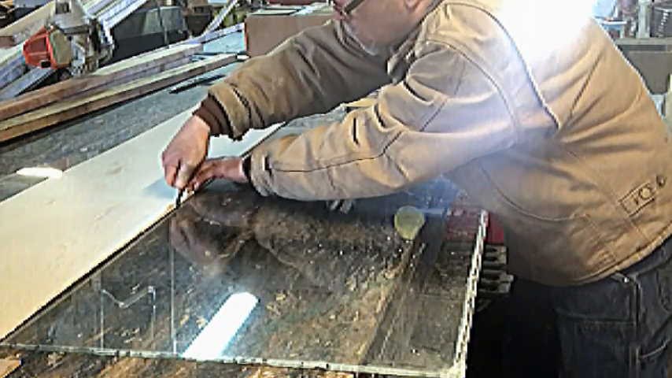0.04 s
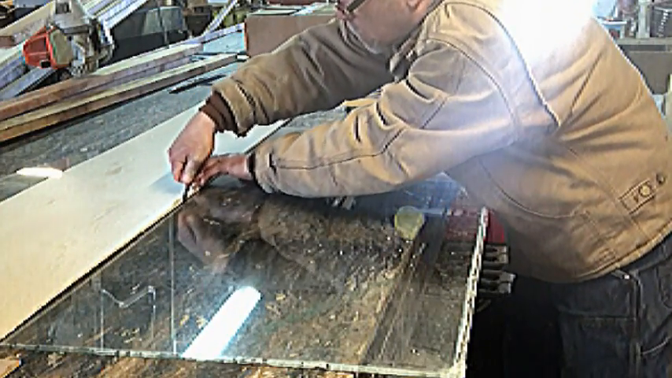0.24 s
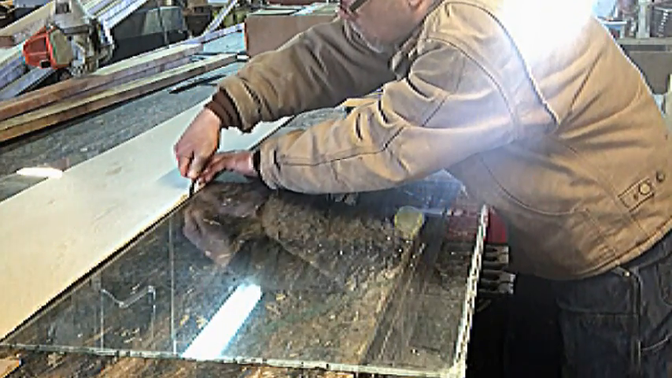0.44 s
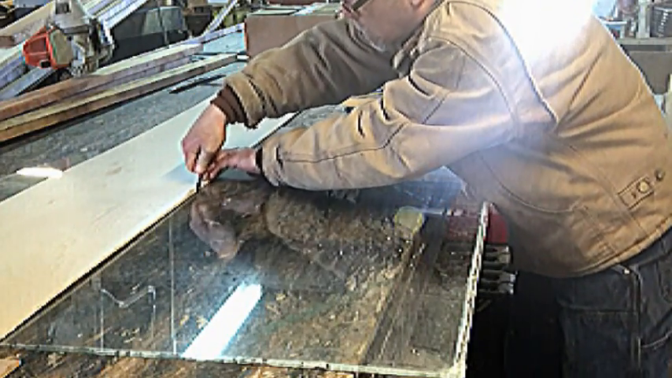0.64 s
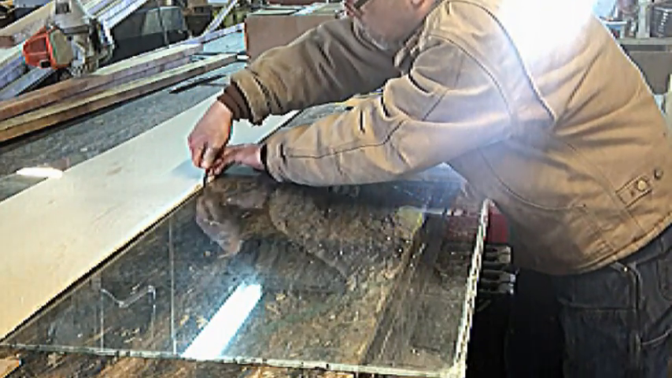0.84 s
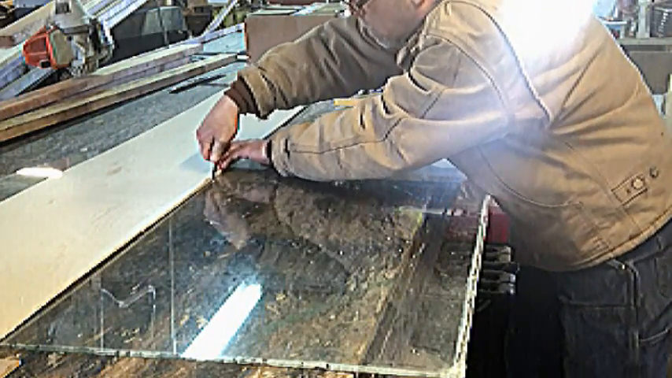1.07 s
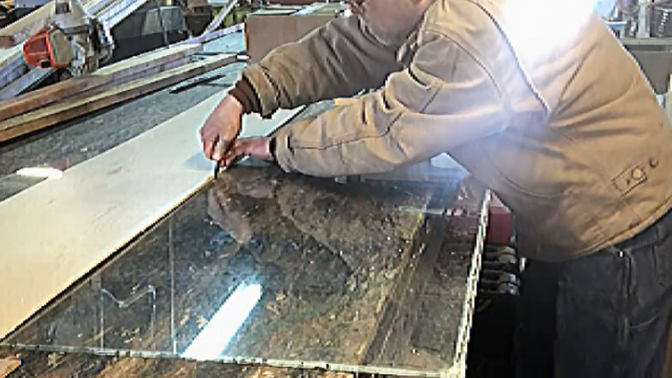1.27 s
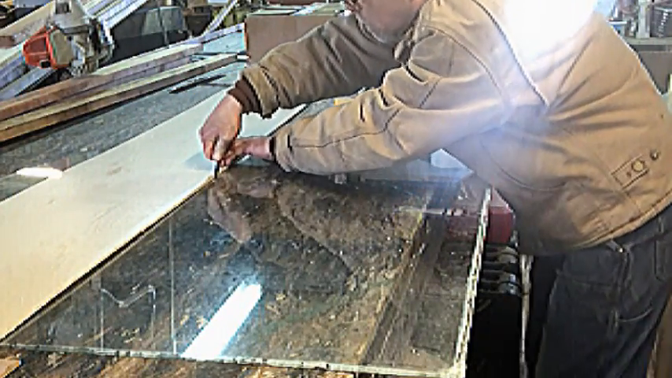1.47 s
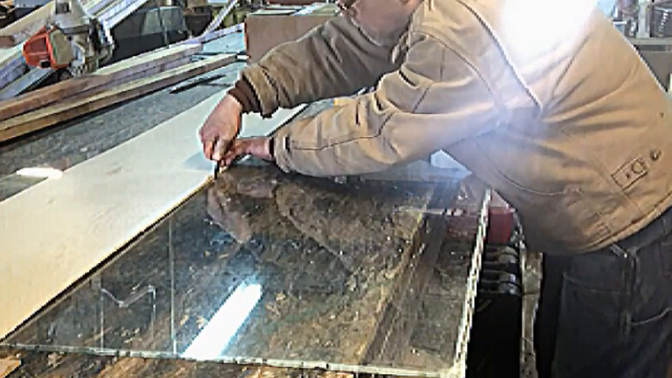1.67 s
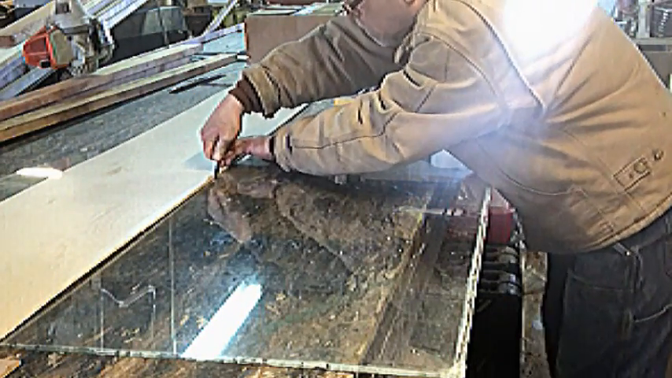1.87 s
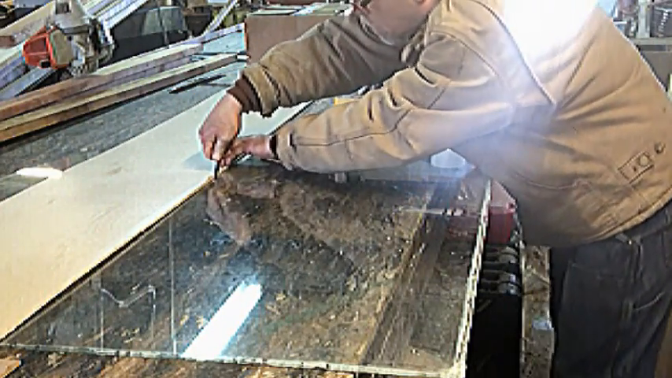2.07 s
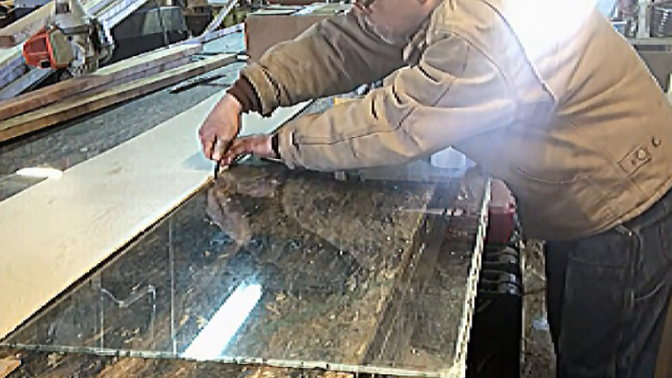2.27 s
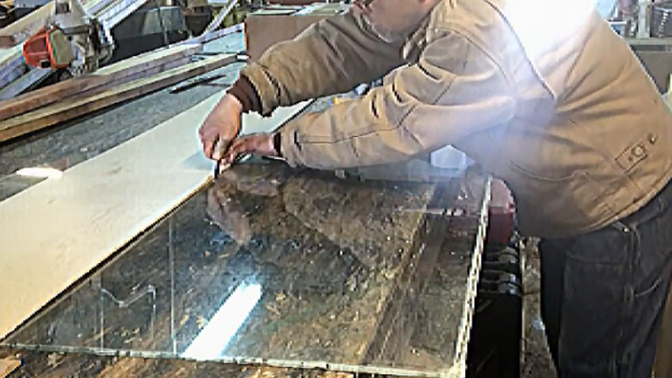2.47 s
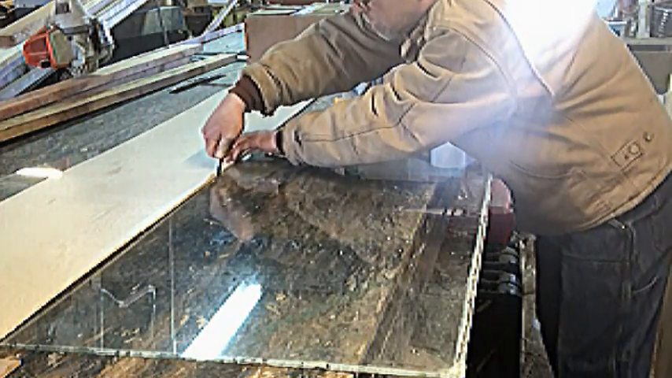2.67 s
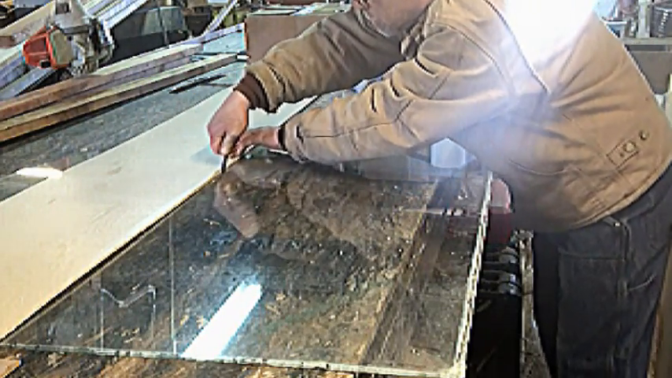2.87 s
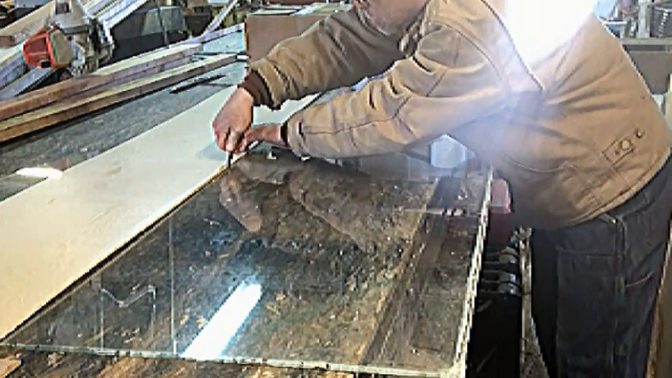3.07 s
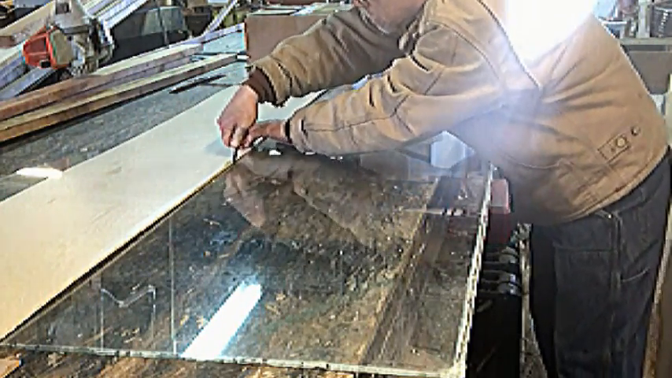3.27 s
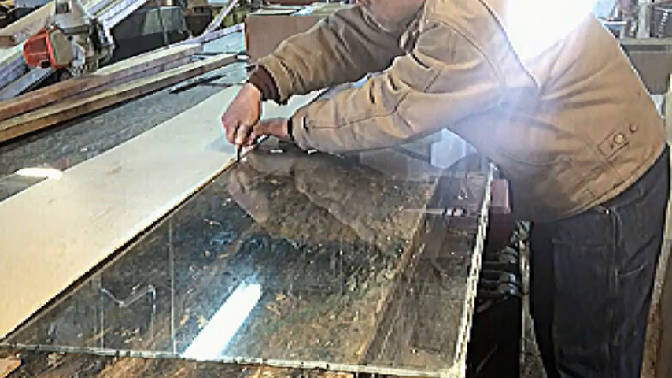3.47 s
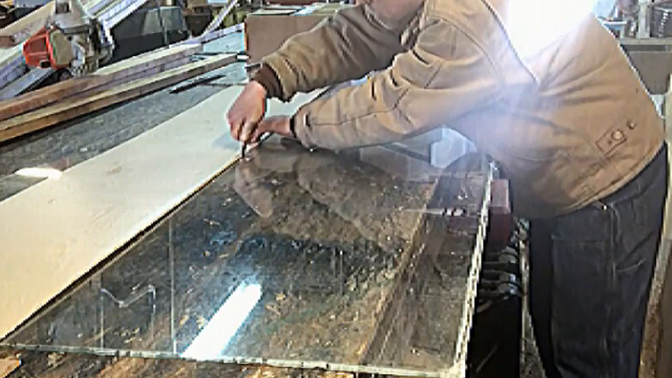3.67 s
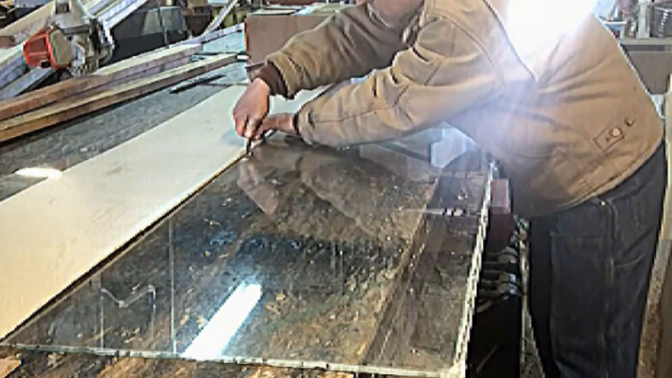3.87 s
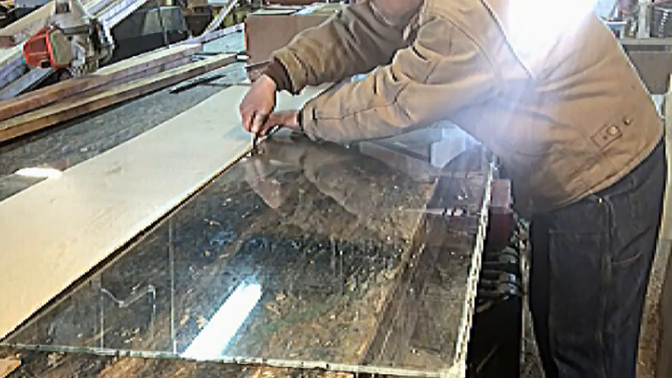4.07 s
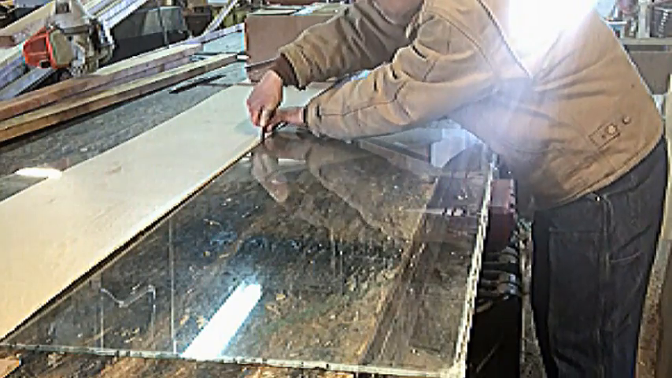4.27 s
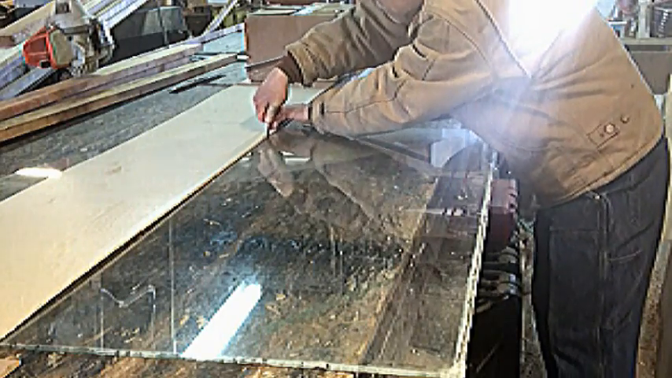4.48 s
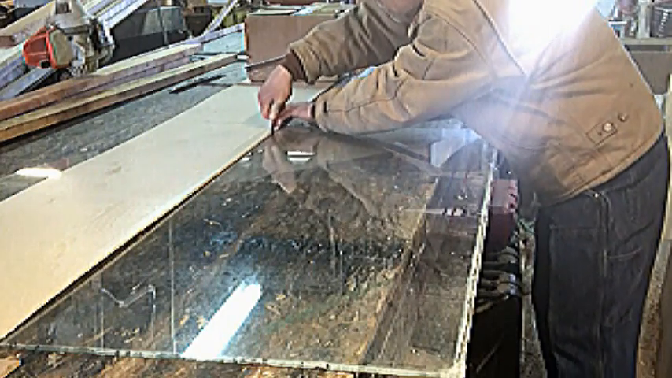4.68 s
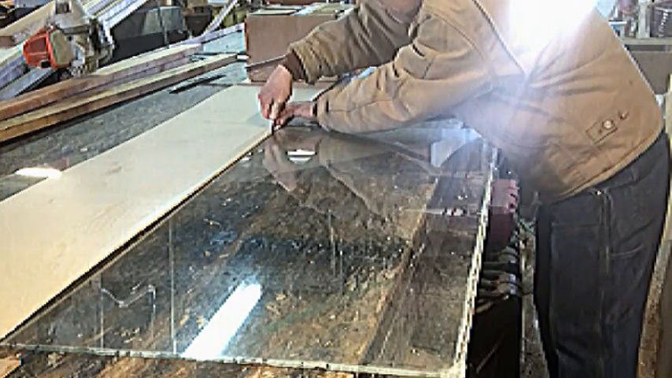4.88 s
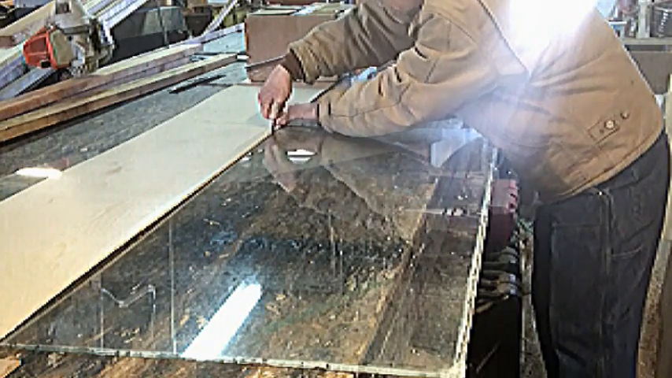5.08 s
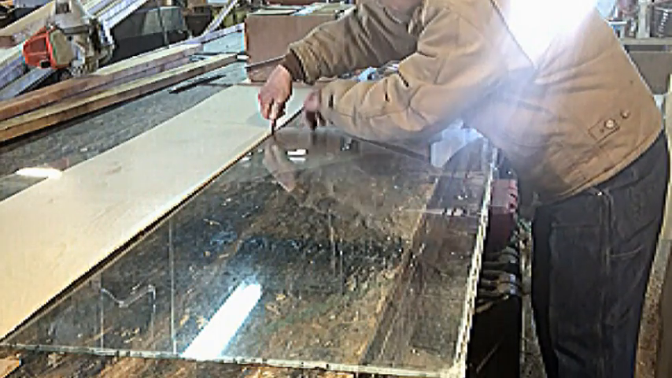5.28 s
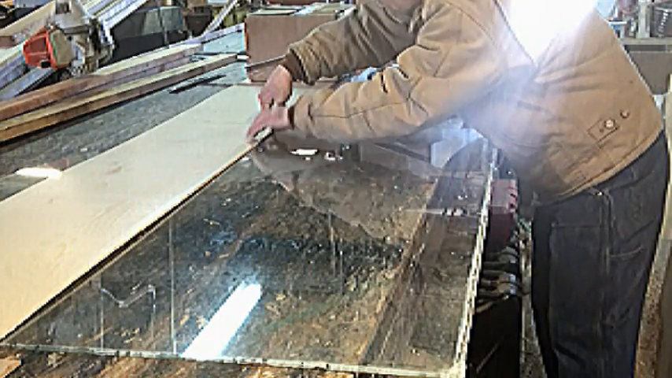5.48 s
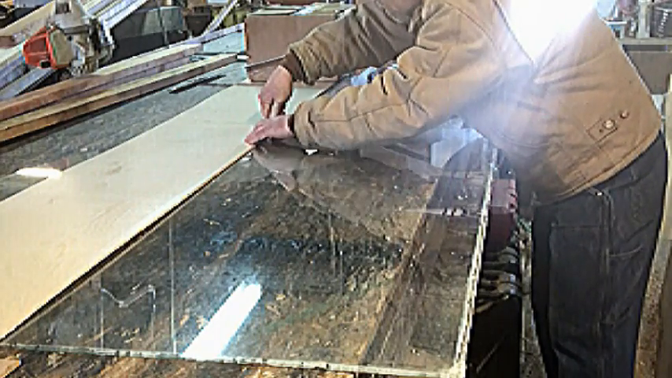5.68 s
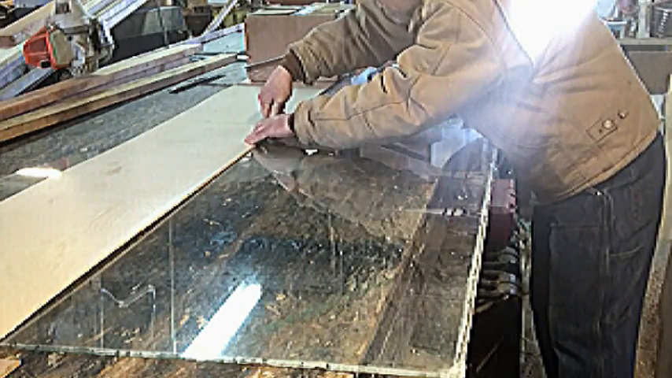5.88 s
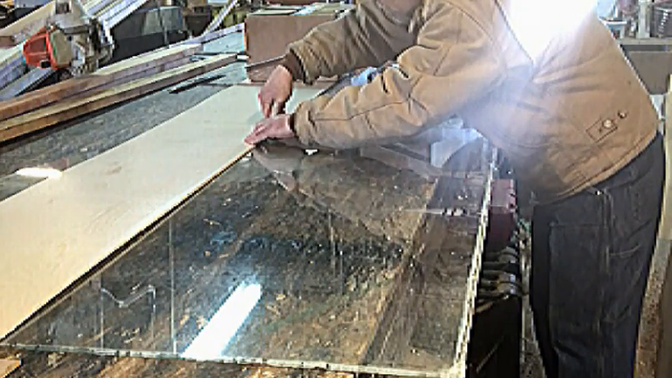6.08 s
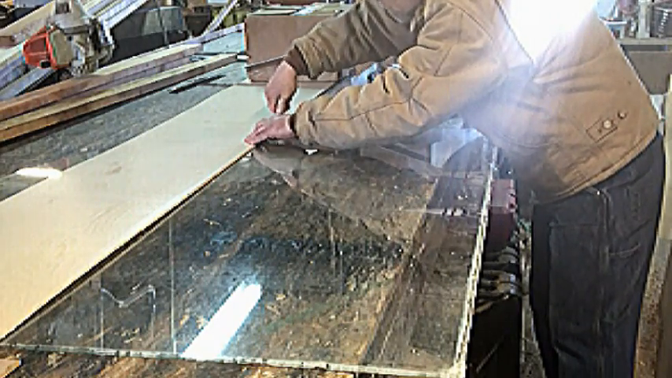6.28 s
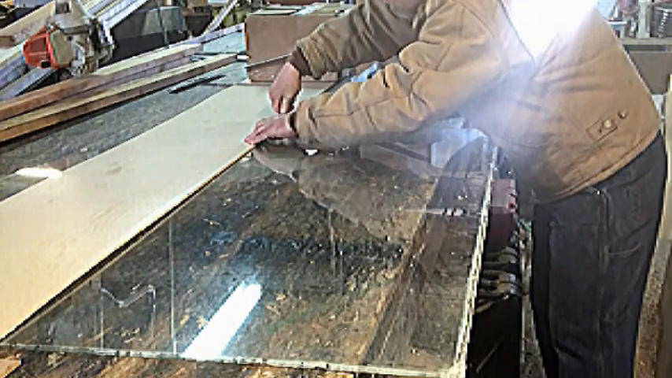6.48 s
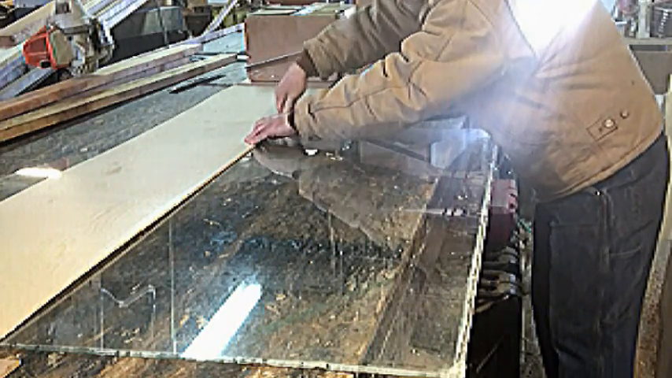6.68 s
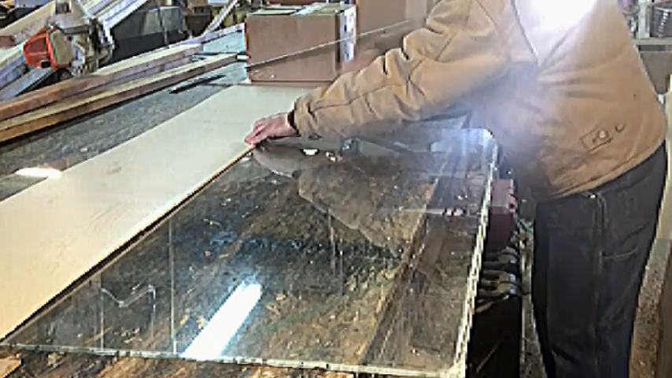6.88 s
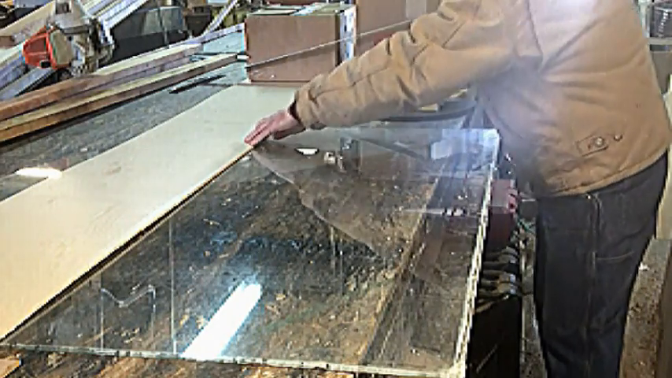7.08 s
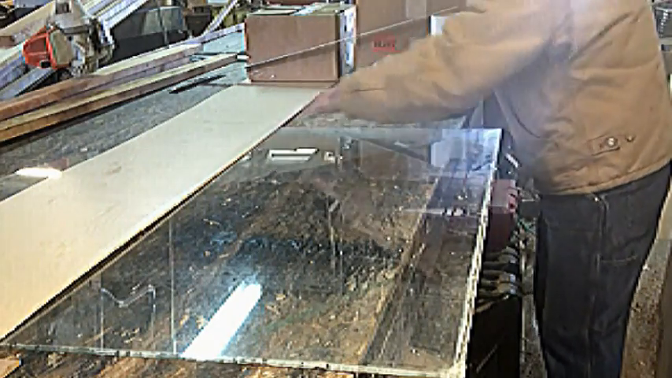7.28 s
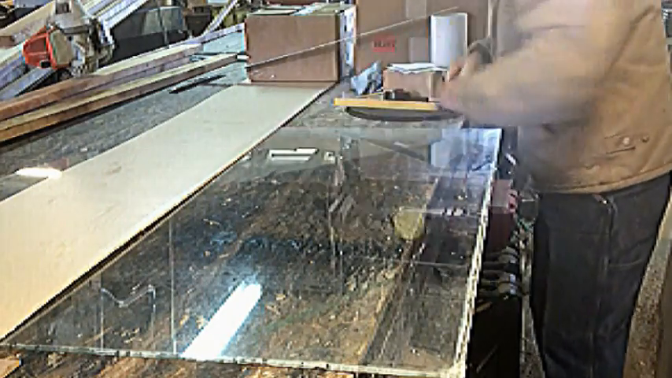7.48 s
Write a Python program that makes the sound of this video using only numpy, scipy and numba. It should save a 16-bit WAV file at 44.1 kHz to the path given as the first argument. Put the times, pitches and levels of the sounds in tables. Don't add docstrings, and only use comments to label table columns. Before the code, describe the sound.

A small wheel cutter rolls over window glass in a workshop, giving a gritty, bright hiss full of tiny cracks and a glassy singing tone. It stops, there are soft knocks and sleeve rubs, then a longer stroke swells and breaks off. After a quiet gap a short, louder scratch ends with a snap and a woody knock. Faint rustling and a tap follow, heard close on a plain mono camera microphone.

```python
import sys
import numpy as np
from scipy import signal
from scipy.fft import rfft, irfft
from scipy.io import wavfile
from scipy.ndimage import uniform_filter1d, map_coordinates
from numba import njit

SR = 44100
rng = np.random.default_rng(int(sys.argv[2]) if len(sys.argv) > 2 else 0)


def amp(db):
    return 10 ** (np.asarray(db, float) / 20)


def write(x):
    x = np.atleast_2d(x).T
    wavfile.write(sys.argv[1], SR, np.round(np.clip(x, -1, 1) * 32767).astype(np.int16))


N = 332514
TIME = np.arange(N) / SR

# [t/s, hiss level/dB]
STROKES = [
    [(0, -24.5), (.33, -26.5), (.42, -25), (.62, -24), (.95, -25), (1.238, -27.5), (1.252, -47)],
    [(2.64, -27.5), (2.67, -24.5), (2.79, -25), (3.06, -23.5), (3.42, -26), (3.88, -22), (4.3, -20.5),
     (4.5, -20), (4.73, -26)],
    [(6.11, -24), (6.156, -21), (6.248, -16.5), (6.26, -16), (6.31, -18.5)],
]
# [start t/s, treble share level/dB, fringe climb/(share per s)]
PACE = [
    (0, -12, 0.13),
    (2.3, -12, 0.21),
    (5.9, -8, 0.63),
]
# [t/s, peak level/dB, tearing duration/ms]
BITES = [(2.4229, -17.5, .02), (2.4309, -18, .02), (2.4441, -16.5, 0.032), (2.4615, -19, 0.035),
         (2.5666, -21.5, 0.046), (2.58, -19.5, 0.03), (2.5866, -22, .02), (2.607, -16.5, 1.3),
         (2.6269, -16, 1.3), (5.985, -19.5, 5.4), (6.029, -15, 6.5), (6.062, -15.5, 4.4), (6.102, -20, 4)]
# [t/s, peak level/dB]
SNAPS = [(0.1121, -20), (0.4414, -21), (0.6574, -11), (0.8375, -11), (0.8904, -13), (0.9572, -8),
         (2.6668, -16), (3.1487, -13), (3.4739, -11), (3.4969, -13), (3.6181, -9.5), (3.7014, -27),
         (3.775, -9), (3.8645, -2.5), (4.2292, -10), (4.2482, -9), (4.6657, -12.5), (6.1657, -15),
         (6.2131, -7.5), (6.2406, -9), (6.3054, 0)]
# [t/s, level/dB, duration/ms]
HALTS = [(0.067, -11, 15), (0.167, -16, 18), (0.182, -3, 6.3), (0.357, -27, 10.5), (0.385, -23, 17),
         (0.493, -7, 11), (0.575, -5, 24), (0.751, -12, 31), (0.822, -14, 26), (0.869, -15, 28),
         (1.023, -8, 11), (1.035, -1, 9), (1.055, -15, 4.7), (1.168, -12.5, 23), (2.72, -27, 10),
         (2.751, -8, 20), (2.849, -4, 9), (3.244, 7, 6), (3.362, 0, 5), (3.468, -19, 23), (3.61, -13, 20),
         (3.672, -18, 9.4), (3.689, -12, 25), (3.72, -12, 20), (3.802, -5, 45), (4.089, -6, 13.4),
         (4.491, -6.5, 25), (4.651, -8, 13), (.346, -14, 12),
         (0.045, -20, 7), (0.097, -13, 14), (0.144, -10.0, 5), (0.257, -14, 6.3), (0.278, -4, 16),
         (0.436, -14, 5.5), (0.474, -4, 5.6), (0.591, -3, 7.0), (0.632, -30, 4), (0.678, 2, 20),
         (0.77, 1, 8.0), (0.793, -29, 4.8), (0.952, -2, 13), (1.114, 1, 6.4), (2.82, -3, 7.7),
         (2.947, -8, 8.9), (2.963, -10, 5.9), (2.999, -8.0, 8.0), (3.063, -6.0, 11), (3.115, -3.5, 15),
         (3.2, -11, 6.9), (3.581, -8, 4.4), (3.783, -7.0, 9.9), (3.861, -10.5, 5.4), (3.92, -8.5, 6.4),
         (4.029, -6, 7.0), (4.136, -11, 6.7), (4.194, 0, 17), (4.376, -7.0, 13), (4.392, -6, 7.8),
         (4.453, -10, 19), (4.475, -4, 7.0), (4.518, -9, 11), (4.546, 0, 8.9), (6.224, -6, 6.1)]
# [t/s, level/dB, duration/ms]
SURGES = [(0.023, 4.2, 11.0), (0.084, 2.7, 17.0), (0.116, 5.6, 32), (0.189, 1.9, 7.3), (0.249, 7, 12),
          (0.313, 6, 12), (0.33, 9.2, 14), (0.368, 3.6, 17.0), (0.422, 3.2, 13), (0.446, 6.0, 16),
          (0.529, 4.8, 27), (0.624, 3.1, 14.0), (0.639, 7.4, 15), (0.661, 5.0, 7), (0.728, 6.0, 22),
          (0.786, 2.6, 24), (0.807, 4.8, 13), (0.838, 11.4, 21), (0.894, 3.4, 18), (0.936, 5, 29),
          (0.977, 4.4, 18), (1.007, 5.1, 21), (1.082, 5, 26), (1.132, 1.7, 8.1), (1.195, 2.9, 7.6),
          (1.21, 2.3, 3.7), (2.67, 7.5, 21), (2.702, 6.0, 11.0), (2.731, 3.6, 22), (2.769, 3.6, 28),
          (2.911, 3.5, 14), (2.93, 2.5, 14), (2.954, 2.7, 11.0), (3.03, 1.5, 15), (3.151, 6.2, 28),
          (3.188, 9, 21), (3.29, 6.7, 15), (3.342, 6, 31), (3.44, 3.6, 18.0), (3.455, 4.0, 9.0),
          (3.5, 2.7, 12), (3.548, 4.0, 10), (3.563, 1.9, 11), (3.645, 10.4, 13), (3.712, 3.7, 22.0),
          (3.732, 3.1, 9.2), (3.775, 2.4, 7.1), (3.868, 4.6, 8.1), (3.894, 2.3, 5.1), (4.022, 3.0, 11),
          (4.124, 4.9, 37), (4.178, 3.4, 39), (4.233, 3, 13.0), (4.25, 3.6, 8.2), (4.34, 5, 14.0),
          (4.426, 2.5, 14), (4.537, 2.8, 21.0), (4.604, 3.4, 56), (4.669, 6.1, 23.0), (4.71, 7, 8.8)]
# [f/Hz, width/Hz, gain/1]
CHIP = [(2750, 700., -.8), (3490, 250., 1.45), (4200., 310, 0.55)]
# [f/Hz, level/dB per Hz]
PANE = [(1060, -28.5), (1800, -18), (2120, -19.5), (2630, -15), (3810, 4), (4820, -12), (5320, -10),
        (5990, -8.5), (7850, -20), (8830, -15), (10600, -21.5), (11600, -18), (12600, -17.5), (14800, -19),
        (15600, -25)]
# [delay/ms, level/dB, shortening/(1 per s of rolling)]
EDGES = [(1.5, -18, 0.201), (2.5, -10.5, .3), (3.6, -9, 0.124), (4.7, -12.5, .25), (6.3, -14, 0.1037)]
# [start t/s, duration/s, start f/Hz, level/dB]
FRINGES = [(-.1, 0.98, 3452, 0.5), (.4, 0.72, 3545, 2.5), (-.1, 0.34, 2940, -13), (.45, 0.18, 3220, -2.5),
           (1.013, 0.27, 3645, 2.5), (2.355, 0.14, 3900, -1.5), (2.516, 0.26, 3820, -7),
           (2.586, 0.32, 3150, -1.5), (2.826, 0.27, 3760, -5), (2.842, 0.33, 3180, 0.5),
           (3.077, 0.3, 3720, -2.5), (3.183, 0.33, 3210, 1.5), (3.405, 0.27, 3820, -0.5),
           (3.67, 0.31, 3680, -2.5), (3.81, 0.35, 3390, -1), (3.923, 0.23, 3940, -2),
           (4.066, 0.18, 3290, -8), (4.125, 0.21, 4040, -0.5), (4.243, 0.27, 3530, -4),
           (4.286, 0.18, 4000, -3), (4.506, 0.23, 3720, -5), (4.542, 0.23, 3420, -1.5),
           (5.931, 0.18, 3360, -3), (5.93, 0.16, 3910, -2.5), (5.93, .19, 4220, -3), (6.093, .19, 3570, 1),
           (6.233, 0.082, 5240, -7.5), (6.23, 0.2, 3440, -4.5), (-.1, .5, 4200, -10.5),
           (.35, 0.23, 4270, -26), (.72, 0.2, 3360, -2.5), (1.032, .15, 5670, 2), (1.0, 0.21, 3030, -5),
           (1.027, 0.098, 4230, -2), (2.95, 0.2, 5050, -7.5), (3.098, 0.12, 5700, -1),
           (3.46, 0.3, 3340, -8), (3.424, 0.3, 5320, -0.5), (3.605, 0.046, 5550, -1),
           (3.665, 0.075, 3500, -1), (3.783, 0.15, 4070, -2.5), (3.863, 0.24, 3250, -19),
           (4, 0.1, 3400, -17), (4.18, 0.048, 4800, -6), (4.34, 0.35, 5200, -5.5),
           (4.405, 0.63, 5920, -2.5), (2.37, 0.34, 3140, -6), (6.116, 0.089, 5900, -10),
           (6.198, 0.089, 4460, -7)]
# [f/Hz, level/dB]
STANDING = [(4750, -9.5), (5300, 3.5), (5800, -1), (6460, 4.5), (6890, -1), (7970, 1), (8480, 5.5),
            (9140, 4.5), (11800, 5.5), (12400, 9), (13060, 7.5), (14300, 2)]
# [t/s, rub level/dB, hum f/Hz]
LEAN = [(0, -43, 299), (.51, -40.5, 357), (.93, -44, 592), (1.08, -38.5, 313), (1.26, -52.5, 353),
        (1.5, -57, 624), (2.16, -58.5, 283.6), (2.56, -54.5, 386), (2.68, -40.5, 327.5), (3.3, -39, 337),
        (3.6, -41, 602), (4.19, -37.5, 699), (4.67, -45.5, 447), (4.78, -56, 391), (5.5, -65.5, 430),
        (6.0, -59, 326.5), (6.25, -36, 468), (6.33, -42, 330)]
# [start t/s, duration/s, start f/Hz, level/dB]
HUMS = [(0, .75, 231, -3.5), (.2, 0.32, 1040, 1), (0.842, .35, 1540, 2.5), (2.95, .5, 543, 7),
        (2.956, 0.24, 765, 2.5), (3.001, .45, 1296, 3.5), (3.503, 0.41, 1820, 3), (3.803, .4, 341, 5.5),
        (3.8, .3, 2370, 1.5), (4.1, .35, 1510, 7), (4.15, .55, 1860, 3), (4.307, 0.29, 920, 6),
        (6.1, .2, 2150, 3.5), (2.0, 0.47, 230, 12.5), (4.76, .22, 1360, 11), (6.05, .25, 523, 6),
        (1.2, 0.12, 1820, 13)]
# [f/Hz, level/dB per Hz]
RUB = [(100, -38.5), (200, -2.5), (350, -2), (600, -5), (1200, -4.5), (2000, -9), (3500, -14.5),
       (8000, -40.5)]
# [peak t/s, level/dB, rise/(s per 20 dB), fall/(s per 20 dB)]
SWAYS = [(.15, -50, .5, 1.8), (1.07, -49, 0.27, 0.15), (2.75, -52, .4, 1), (3.25, -45, 1, .2),
         (3.54, -39.5, 0.34, 0.21), (3.82, -49, 0.33, 0.16), (4.19, -40.5, 0.62, 0.44),
         (5.7, -52.5, 0.33, 0.41), (6.04, -52, 0.12, 0.45), (6.335, -37, .03, 0.33), (7.5, -56, 0.28, .4)]
# [peak t/s, level/dB, rise/(s per 20 dB), fall/(s per 20 dB)]
SHUFFLES = [(0, -44.5, .1, .3), (.45, -54, 0.91, 0.85), (1.28, -51.5, 0.18, 0.29),
            (1.56, -35.5, 0.037, 0.068), (1.8, -49.5, 0.61, 0.15), (1.98, -35, 0.05, 0.29),
            (2.86, -50, 0.46, 2.2), (3.8, -45, 0.61, 0.26), (4.15, -51, .8, 1.7), (4.76, -47.5, .14, 0.066),
            (5.12, -50.5, 0.099, 0.26), (5.51, -59, 0.21, .2), (6.0, -58, 0.27, 0.38),
            (6.33, -30, 0.026, .1), (6.46, -51, .1, 0.37), (7.45, -64, .3, .5)]
# [peak t/s, level/dB, rise/(s per 20 dB), fall/(s per 20 dB)]
SCUFFS = [(1.56, -54, .07, 0.1), (1.7, -44.5, 0.22, 0.14), (1.98, -52.5, 0.076, 0.46),
          (4.9, -51, 0.21, 0.13), (5.13, -57.5, .3, 0.54), (6.9, -61, 1, 1.5), (7.45, -55, 0.11, 2.6)]
# [peak t/s, level/dB, rise/(s per 20 dB), fall/(s per 20 dB)]
BRUSHES = [(1.4, -60, 0.13, 0.36), (1.56, -41, 0.022, 0.011), (1.692, -43, 0.089, 0.043),
           (1.904, -53, 0.016, 0.044), (1.978, -47, .035, .04), (2.026, -50.5, .025, 0.064),
           (2.084, -54.5, .05, 0.21), (2.4, -55.5, 0.16, 0.11), (4.85, -55, .02, .13),
           (5.15, -51, 0.17, 0.046), (5.264, -44, 0.069, .012), (5.524, -46.5, 0.013, 0.028),
           (5.722, -67.5, .1, 0.01), (6.506, -59, .01, 0.062), (6.9, -61, 0.45, 1.5),
           (7.098, -50, 0.056, 0.068), (7.168, -52, 0.077, 0.023), (7.33, -72, .5, 0.11),
           (7.46, -63, 0.2, .4)]
# [f/Hz, level/dB per Hz]
CLOTH = [(880, -61), (1500, 7), (1720, -18.5), (1790, -4), (1970, -6.5), (3960, 1), (4860, -3.5),
         (6590, -6), (15600, -21)]
# [t/s, peak level/dB]
TICKS = [(1.554, -24), (4.8453, -32), (5.15, -44), (5.264, -44), (5.5209, -48), (6.5051, -37.5)]
# [t/s, peak level/dB, striker f/Hz, ring factor/1, clatter level/dB]
KNOCKS = [(1.529, -31, 143, 0.33, -10), (1.547, -20, 760, 0.6, -17), (1.554, -37.5, 107, 0.5, -0.5),
          (1.72, -30, 1340, 0.49, -10), (1.911, -38.5, 1350, 0.4, -7), (1.954, -30, 262, 1.8, -11.5),
          (1.993, -35, 113, 0.52, -23), (2.019, -36.5, 242, 1.04, -3), (6.31, -4.5, 835, 0.34, -2.5),
          (6.318, -12, 154.5, 1.03, -25), (6.359, -29.5, 94.6, .68, -26), (7.39, -40, 246, .8, -20),
          (7.451, -22, 540, 0.22, -36), (4.929, -40, 670, 1.1, -21), (4.772, -39, 144, 0.51, -28),
          (5.109, -46, 136, 0.45, -24), (5.22, -41, 133, .7, -24.5), (6.515, -40, 150, 0.47, -24),
          (2.101, -40, 247, 1.2, -21)]
# [f/Hz, level/dB, t60/s]
BOARD = [(52, -9, 0.3), (116, -34, 0.049), (156, -6, 0.43), (261.4, -1, 0.24), (368, 4, 0.085),
         (540, 9, 0.054), (826, -5, 0.11), (1306, -9, 0.055), (1600, -47, .04), (1900, -34, .04),
         (2400, -30, .03)]
# [f/Hz, level/dB per Hz]
SHOP = [(15, -25.5), (25, -1), (70, 3), (539, -12.5), (600, -6.5), (668, -11.5), (3020, -25), (3740, -21),
        (5030, -25), (5610, -21.5), (10400, -31), (14400, -27.5), (15600, -48.5)]

HEARD_LATE_S = 0.0026


def level(x):
    return x / np.sqrt(np.mean(x ** 2))


def colour(x, points):
    hz, db = np.transpose(points)
    grid = np.linspace(1, SR / 2, 2049)
    log_gain = np.interp(np.log(grid), np.log(hz), db) * np.log(10) / 20
    cepstrum = irfft(log_gain)
    cepstrum[1:2048] *= 2
    cepstrum[2049:] = 0
    response = irfft(np.exp(rfft(cepstrum)))
    return signal.fftconvolve(x, response)[:N]


def band(x, lo_hz, hi_hz):
    return signal.sosfilt(signal.butter(3, [lo_hz, hi_hz], "band", fs=SR, output="sos"), x)


@njit
def svf(x, hz, width):
    y, b, l = np.empty(len(x)), 0., 0.
    for i in range(len(x)):
        g, k = np.tan(np.pi * hz[i] / SR), width / hz[i]
        v = (b + g * (x[i] - l)) / (1 + g * (g + k))
        b, l, y[i] = 2 * v - b, l + 2 * g * v, k * v
    return y


def walk(rate):
    k = int(SR / rate)
    steps = np.repeat(rng.standard_normal(N // k + 1), k)
    return level(uniform_filter1d(uniform_filter1d(steps, k), k)[:N])


def gain_curve(tables, column):
    rows = [np.transpose(table) for table in tables]
    return sum(amp(np.interp(TIME, r[0], r[column], -200, -200)) for r in rows)


def swells(events):
    power = 0
    for s, db, rise, fall in events:
        away = np.maximum((s - TIME) / rise, (TIME - s) / fall)
        power = power + amp(2 * db - 40 * away)
    return np.sqrt(power)


def blows(events):
    x = np.zeros(N)
    for s, db, *_ in events:
        x[int(s * SR)] += amp(db)
    return x


def grit(rate, spread_db):
    draw = rng.random((3, N))
    happens = draw[0] < rate / SR
    size = amp(-spread_db * np.log(draw[2] + 1e-9))
    return level(happens * np.sign(draw[1] - .5) * size)


def fringes(source, table, width_hz, pace):
    out = np.zeros(N)
    for k, (s, length, hz, db) in enumerate(table):
        climb = pace * [row[2] for row in PACE if row[0] <= max(s, 0)][-1]
        span = slice(max(int(s * SR), 0), int((s + length) * SR))
        age = TIME[span] - s
        fade = np.sqrt(np.abs(np.sin(np.pi * age / length)))
        width = width_hz * max(1., (hz / 3600) ** 2)
        out[span] += (-1) ** k * amp(db) * fade * svf(source[span], hz * (1 + climb * age), width)
    return out


def shop():
    air = level(band(colour(rng.standard_normal(N), SHOP), 22, 16000))
    return amp(-59.5 + 3.5) * air * amp(0.92 * walk(4.9))


def room(x):
    t60_s = 0.19
    t = TIME[:SR // 2]
    noise = rng.standard_normal(len(t))
    low = uniform_filter1d(noise, size=5)
    high = noise - low
    tail = low * amp(-60 * t / t60_s) + high * amp(-60 * t / (.8 * t60_s))
    tail *= 1 - np.exp(-t / 0.004)
    return signal.fftconvolve(x, tail / np.linalg.norm(tail))[:N]


def bench():
    sway = level(band(rng.standard_normal(N), 43.6, 58.7))
    rumble = level(band(rng.standard_normal(N), 69.6, 160))
    sway_gain = swells(SWAYS) + amp(-76.5)
    rumble_gain = swells(SHUFFLES) + amp(-76.5)
    rub = colour(grit(rate=2300, spread_db=1.5) + 0.21 * rng.standard_normal(N), RUB)
    s, _, hum_hz = np.transpose(LEAN)
    hum = svf(rub, np.interp(TIME, s, hum_hz), 52.0)
    faint_hums = fringes(rub, HUMS, 70, .4)
    leaning = level(rub + amp(4) * hum + amp(4) * faint_hums)
    uneven = amp(1.2 * walk(40))
    scuff_gain = swells(SCUFFS) + (TIME > s[-1]) * amp(-66)
    scuffing = scuff_gain * level(np.roll(rub, SR))
    rubbing = gain_curve([LEAN], 1) * leaning + scuffing
    return sway_gain * sway + rumble_gain * rumble + rubbing * uneven


def rustle():
    cloth = level(colour(grit(rate=6000, spread_db=1.2), CLOTH) * amp(1.2 * walk(90)))
    ticks = band(blows(TICKS), 2500, 14000)
    return swells(BRUSHES) * cloth * amp(-1.0) + amp(3) * ticks


def knocks():
    out, t = np.zeros(N), TIME[:SR // 2]
    hz, mode_db, t60 = np.transpose(BOARD)
    spots = rng.standard_normal((len(KNOCKS), 2, len(BOARD)))
    clatter = level(band(rng.standard_normal(len(t)), 360, 2060))
    push = np.hanning(int(0.5 / 1000 * SR) + 3)
    for (s, db, own_hz, ring, clatter_db), (weight, detune) in zip(KNOCKS, spots):
        i = int(s * SR)
        decay = amp(-60 * t[:, None] / (t60 * ring))
        modes = np.sin(2 * np.pi * hz * (1 + 0.016 * detune) * t[:, None]) * decay
        striker = amp(8.5) * np.sin(2 * np.pi * own_hz * t) * amp(-60 * t * own_hz / 24)
        sound = signal.fftconvolve(modes @ amp(mode_db + 2.7 * weight) + striker, push)
        sound /= np.max(np.abs(sound))
        sound[:len(t)] += amp(clatter_db) * np.roll(clatter, i) * amp(-60 * t / (0.085 * ring))
        out[i:i + len(sound)] += amp(db) * sound[:N - i]
    return out


def jerks(events):
    out = np.zeros(N)
    for s, db, ms in events:
        span = slice(max(int((s - .08) * SR), 0), int((s + .08) * SR))
        out[span] += db * np.exp(-((TIME[span] + HEARD_LATE_S - s) / (.5 * ms / 1000)) ** 2)
    return out


def tears():
    out, pattern = np.zeros(N), rng.standard_normal(SR // 50)
    pattern += sum(gain * svf(pattern, np.full(len(pattern), hz), width) for hz, width, gain in CHIP)
    for s, db, ms in BITES:
        i = int(s * SR)
        run = pattern * np.exp(-(TIME[:len(pattern)] * 1000 / ms) ** 4)
        out[i:i + len(run)] += amp(db) * run / np.linalg.norm(run)
    return out


def edge_echoes(x, rolling, shake=0.027):
    rolled = np.cumsum(rolling) / SR - 1.8
    out = x.copy()
    for k, (ms, db, shrink) in enumerate(EDGES):
        lag = ms / 1000 * SR * np.exp(-shrink * rolled) * (1 + shake * walk(6))
        out += (-1) ** k * amp(db) * map_coordinates(x, [np.arange(N) - lag], order=3)
    return out


def radiate(force):
    half = [(hz, db / 2) for hz, db in PANE]
    swell = colour(colour(force, half)[::-1], half)[::-1]
    return np.roll(swell, SR // 800)


def scatter(force, rise_s, t60_s):
    t = TIME[:SR // 3]
    memory = amp(-120 * t / t60_s) * (1 - np.exp(-t / rise_s))
    power = signal.fftconvolve(force ** 2, memory / memory.sum())[:N]
    return np.sqrt(np.abs(power)) * rng.standard_normal(N)


def standing(x):
    width_hz, wander_db, drift = 70., 7, .02
    out = x
    for hz, db in STANDING:
        flare = amp(db - 4.0 + wander_db * np.tanh(walk(20)))
        out = out + flare * svf(x, hz * (1 + drift * walk(3.4)), width_hz)
    return out


def crack_force(hiss):
    stutter_db, bite_db, snap_db = 0.5, 11.5, 7.0
    spurts = amp(stutter_db * np.tanh(1.8 * walk(150) + .6))
    cracks = grit(rate=1700, spread_db=2.0)
    relief = uniform_filter1d(band(cracks, 3000, 4500) ** 2 + 1e-9, size=500) ** .45
    cracks = spurts * cracks / relief
    unit = np.max(np.abs(radiate(blows([(1, 0.011)]))))
    steady = np.std(band(radiate(cracks), 2800, 4800))
    single = amp(bite_db) * tears() + amp(snap_db) * band(blows(SNAPS), 2780, 7000)
    return cracks * hiss / steady + single / unit


def cutter():
    sing_db, sing_width_hz, hollow, treble_softness = 10, 240, 0.99, 0.32
    pressure = gain_curve(STROKES, 1)
    touching = pressure > 1e-6
    stuck_db = jerks(HALTS + SURGES) - 1.5
    hiss = pressure * amp(.55 * stuck_db)
    force = crack_force(hiss)
    pane = radiate(edge_echoes(force, touching))

    between = pane - hollow * svf(pane, np.full(N, 3700.), 780.0)
    fringe_source = pane - 0.4 * svf(pane, np.full(N, 3780.), 830.0)
    singing = amp(sing_db) * fringes(fringe_source, FRINGES, sing_width_hz, 1)
    below = signal.butter(4, 7300, fs=SR, output="sos")
    body = signal.sosfilt(below, between + singing)
    damped_db = .4 * np.roll(stuck_db, int(HEARD_LATE_S * SR))
    damped_db = damped_db + 2.5 * np.tanh(2 * walk(130) + .8) * touching
    body = body * amp(damped_db)

    short_waves = colour(scatter(force, rise_s=0.0027, t60_s=0.086), PANE)
    treble = band(0.72 * pane + 1.63 * short_waves, 7500, 19000)
    treble -= .6 * svf(treble, np.full(N, 10500.), 700.)
    soft = uniform_filter1d(np.where(touching, hiss, amp(-25)), size=600) / amp(-25)
    starts, shares_db, _ = np.transpose(PACE)
    treble_db = shares_db[np.searchsorted(starts, TIME, side="right") - 1]
    treble = amp(treble_db + 10.5) * soft ** -treble_softness * treble

    glow = colour(scatter(force, rise_s=0.045, t60_s=0.19), PANE)
    glow -= 0.39 * svf(glow, np.full(N, 3750.), 900.)
    return amp(-4.0) * standing(body + treble + amp(-6.5) * glow)


def scene():
    near = knocks() + rustle()
    background = shop() + bench()
    mono = background + near + amp(-11.5) * room(near) + cutter()
    return np.array([mono, mono])


def roll_off(x):
    return signal.sosfilt(signal.butter(12, 16320, fs=SR, output="sos"), x)


def record(dry):
    rounded = .8 * np.tanh(dry / .8)
    low_pass = signal.ellip(12, .2, 70, 15550, fs=SR, output="sos")
    mix = signal.sosfilt(low_pass, rounded)
    return roll_off(mix)


dry = scene()
out = record(dry)
write(out)
```